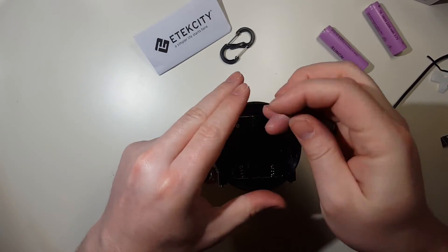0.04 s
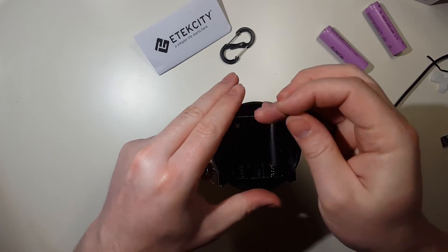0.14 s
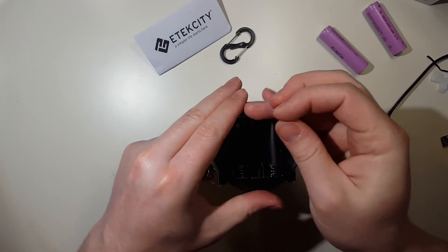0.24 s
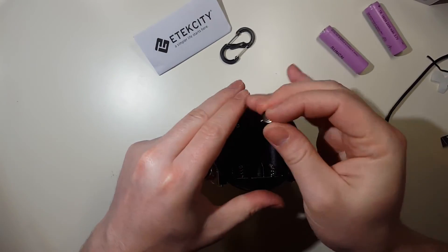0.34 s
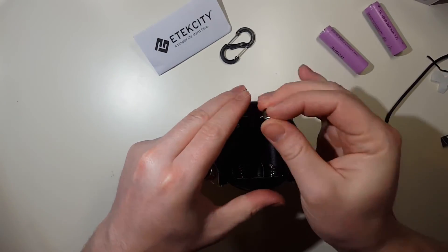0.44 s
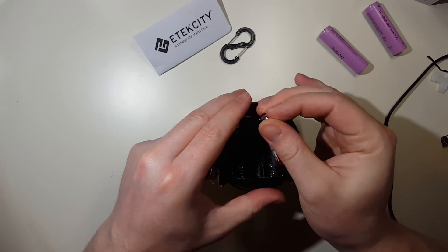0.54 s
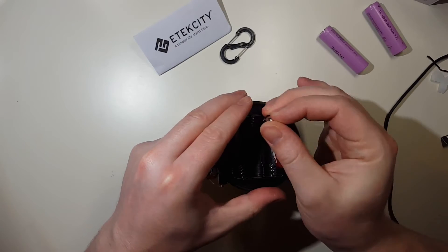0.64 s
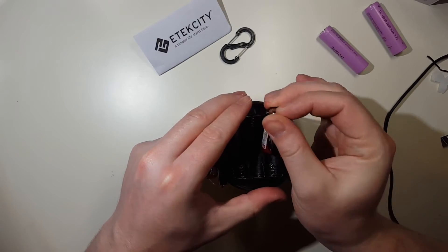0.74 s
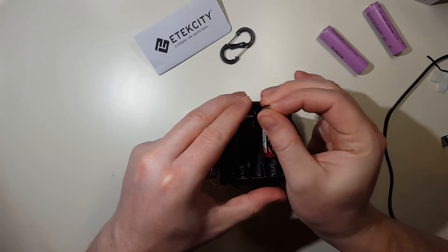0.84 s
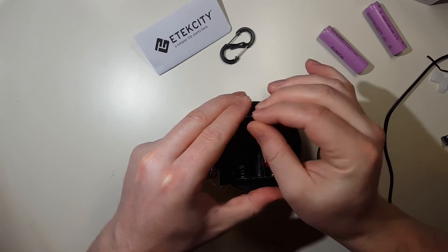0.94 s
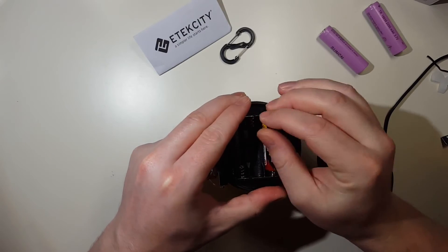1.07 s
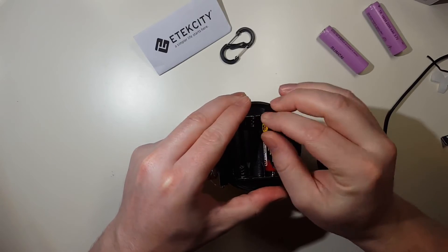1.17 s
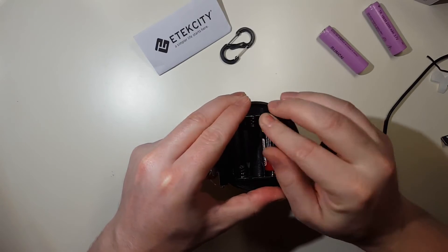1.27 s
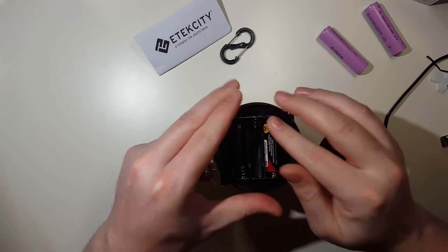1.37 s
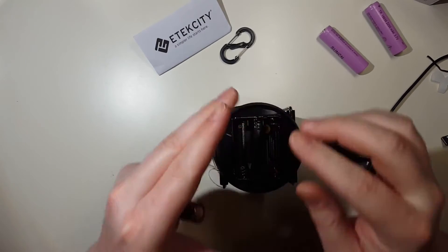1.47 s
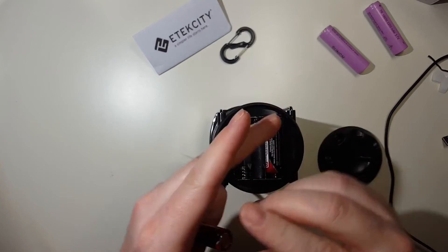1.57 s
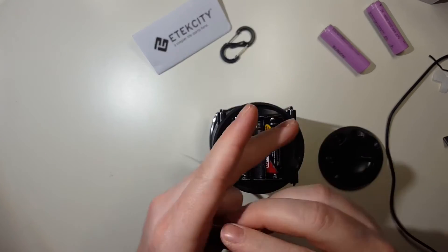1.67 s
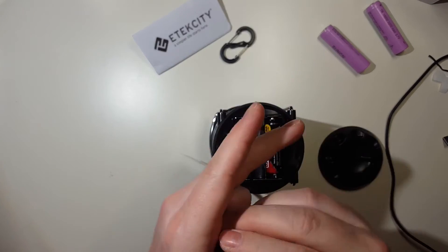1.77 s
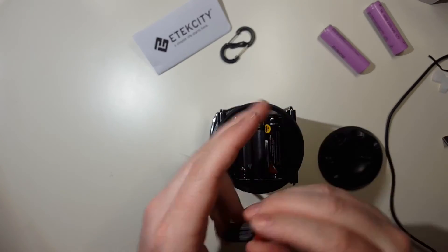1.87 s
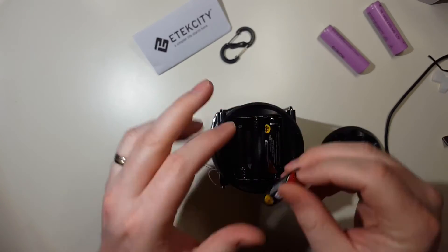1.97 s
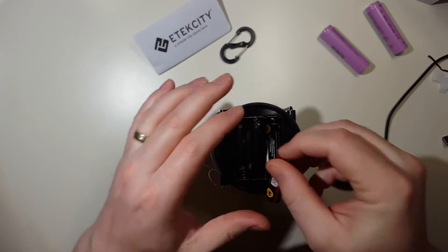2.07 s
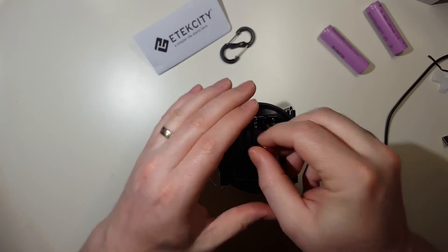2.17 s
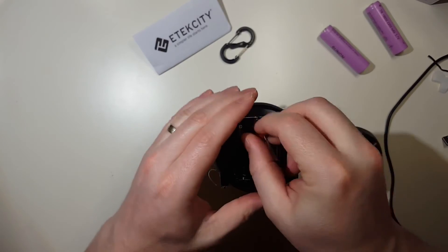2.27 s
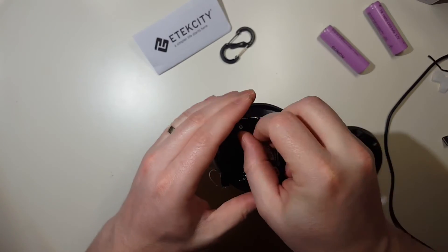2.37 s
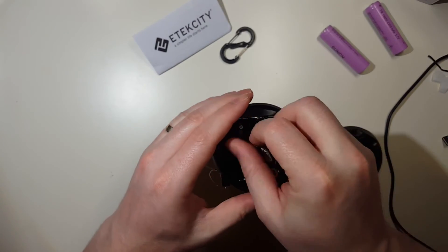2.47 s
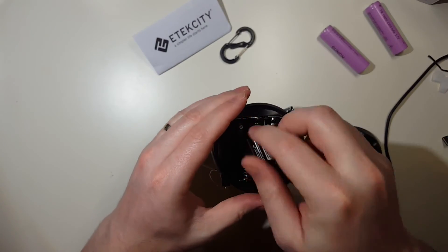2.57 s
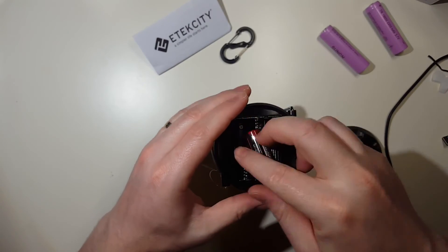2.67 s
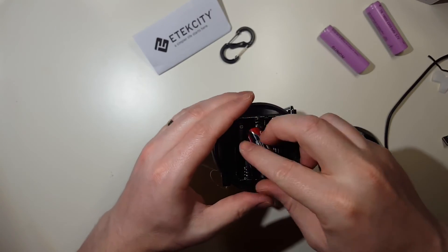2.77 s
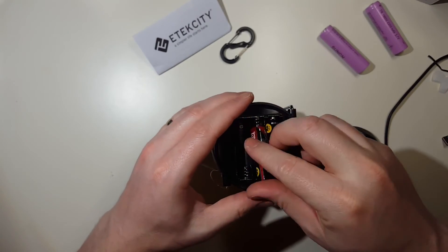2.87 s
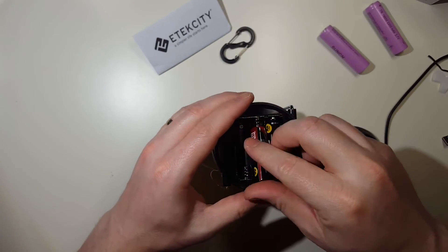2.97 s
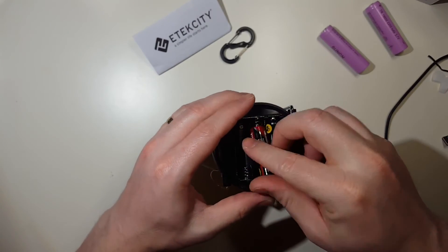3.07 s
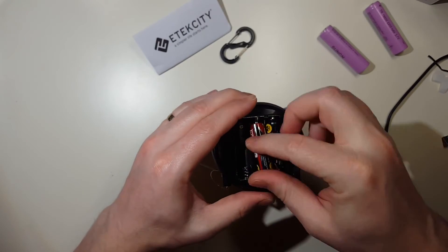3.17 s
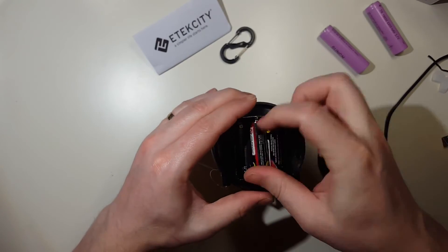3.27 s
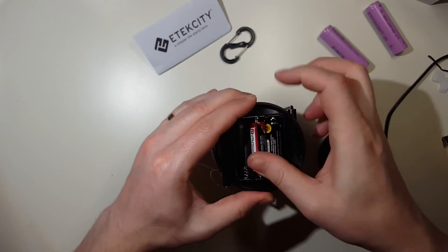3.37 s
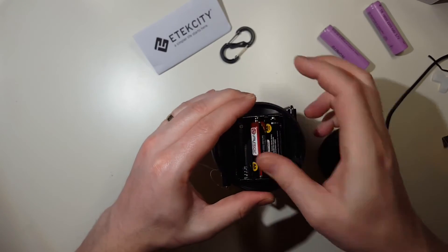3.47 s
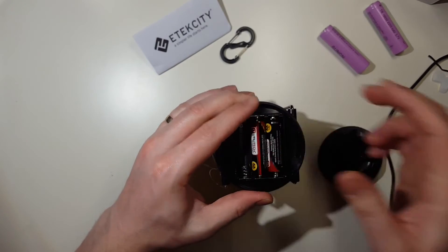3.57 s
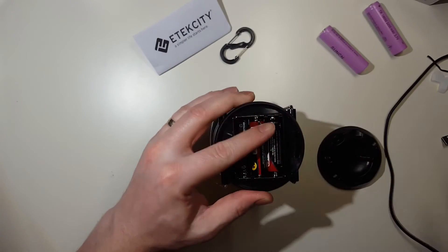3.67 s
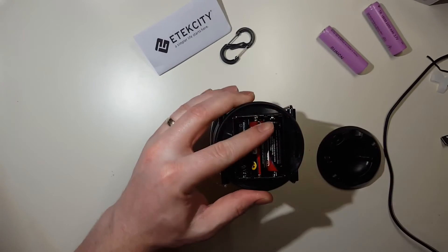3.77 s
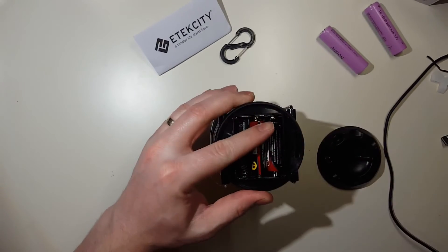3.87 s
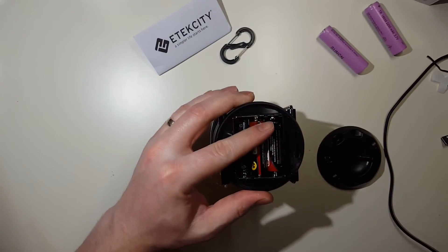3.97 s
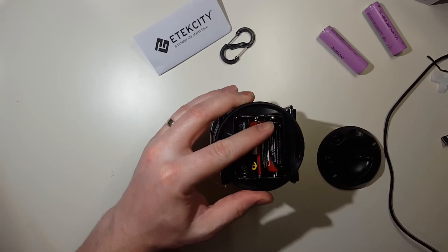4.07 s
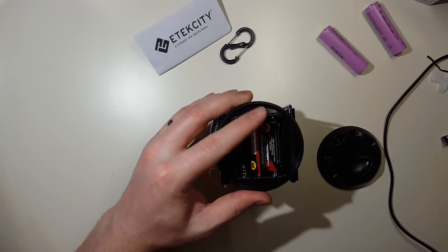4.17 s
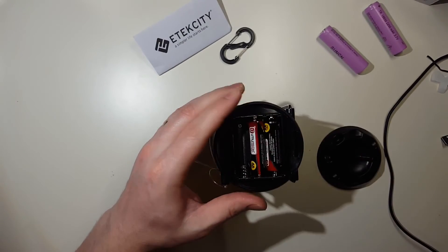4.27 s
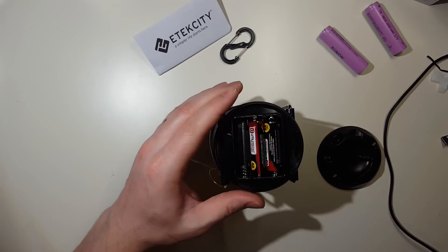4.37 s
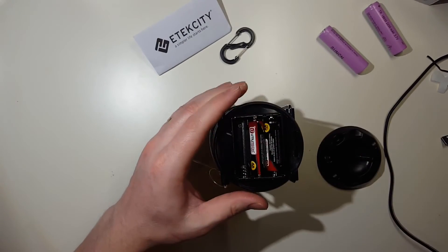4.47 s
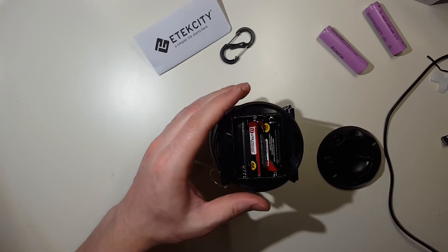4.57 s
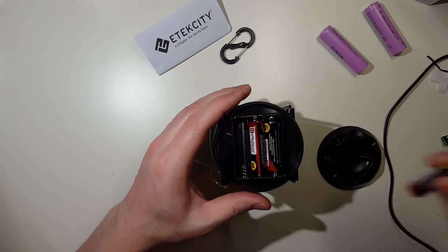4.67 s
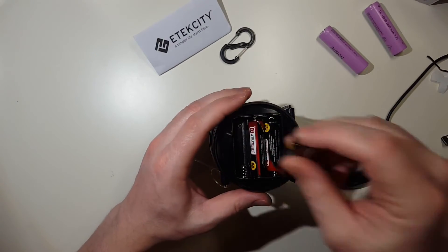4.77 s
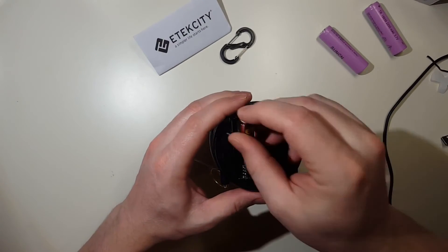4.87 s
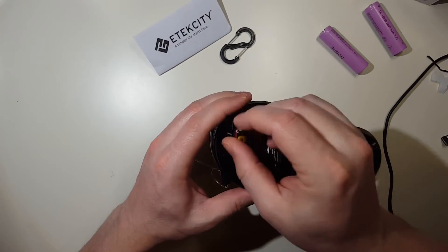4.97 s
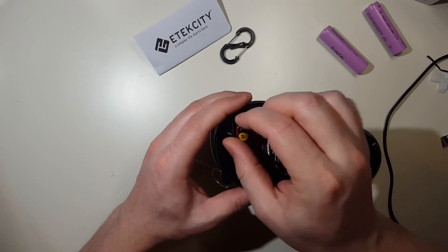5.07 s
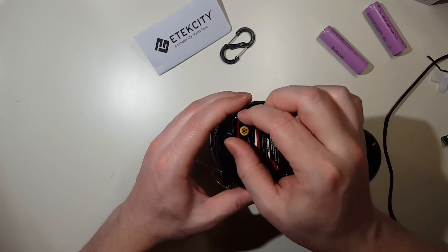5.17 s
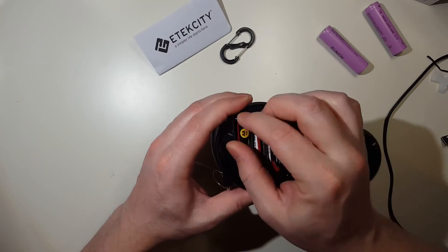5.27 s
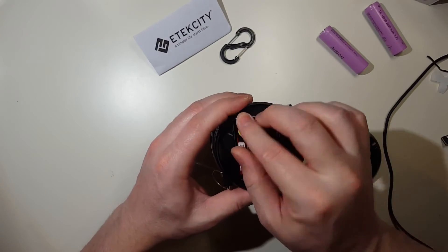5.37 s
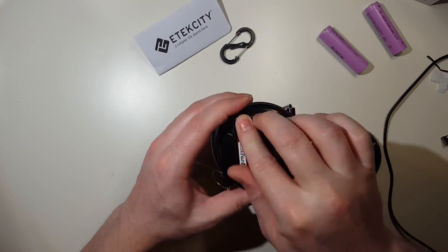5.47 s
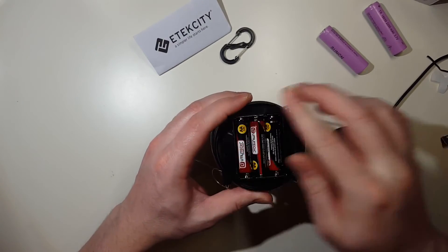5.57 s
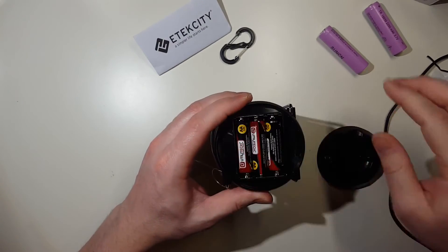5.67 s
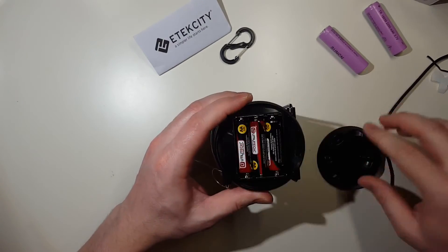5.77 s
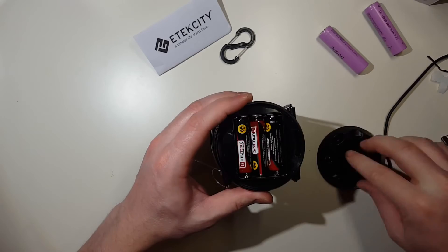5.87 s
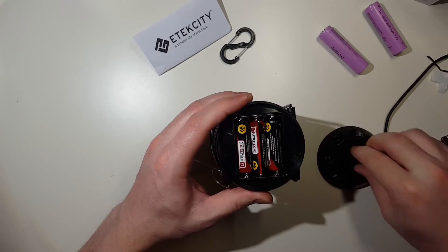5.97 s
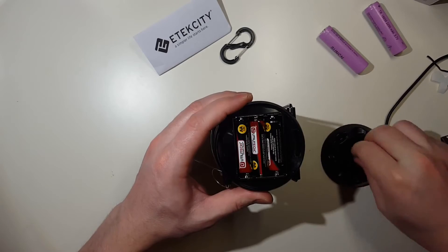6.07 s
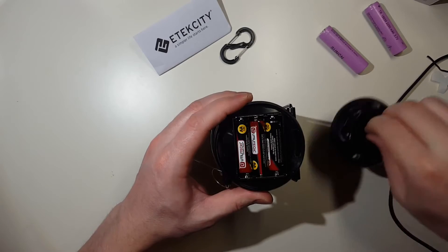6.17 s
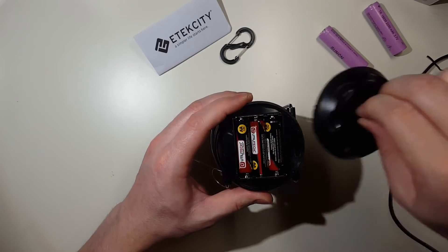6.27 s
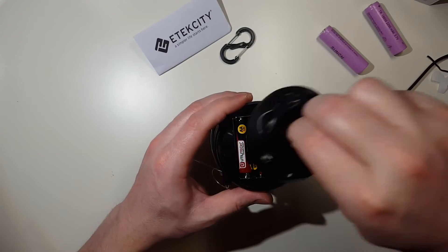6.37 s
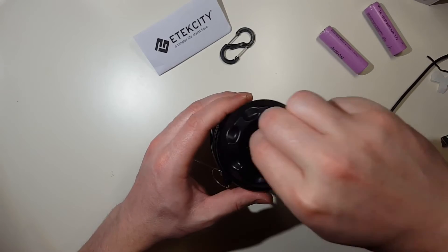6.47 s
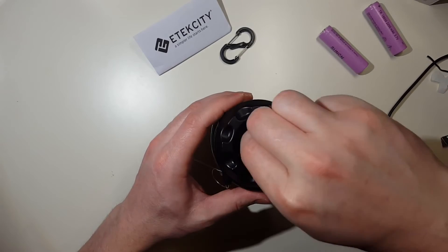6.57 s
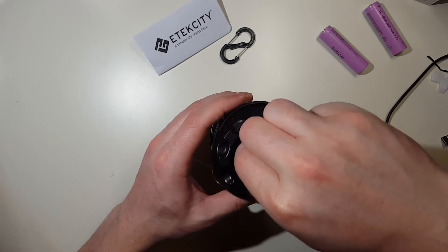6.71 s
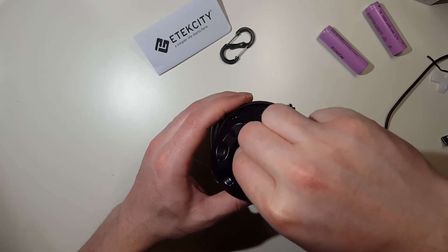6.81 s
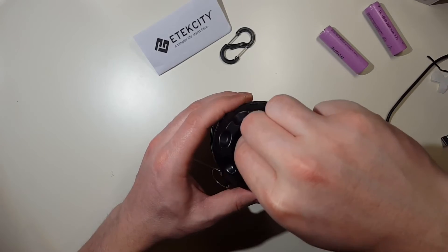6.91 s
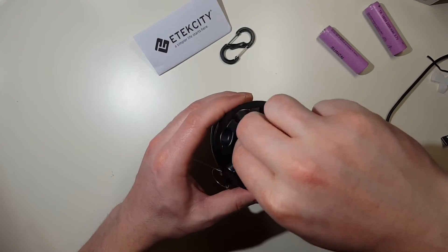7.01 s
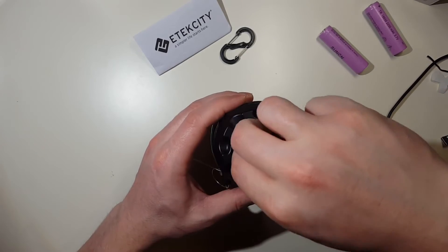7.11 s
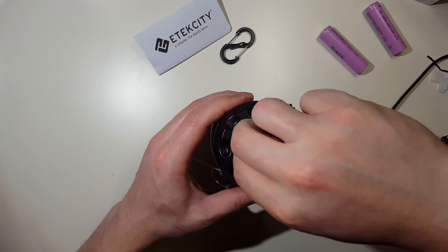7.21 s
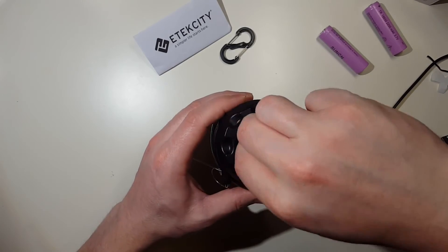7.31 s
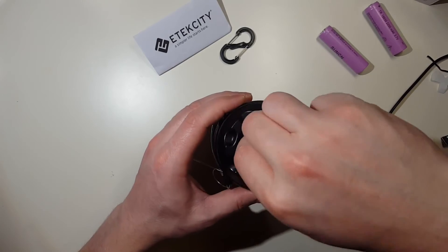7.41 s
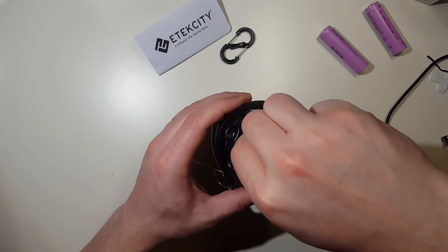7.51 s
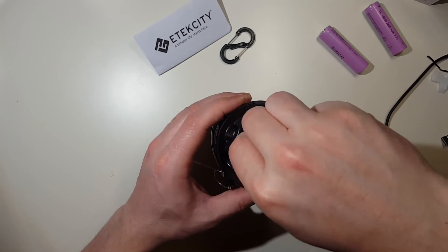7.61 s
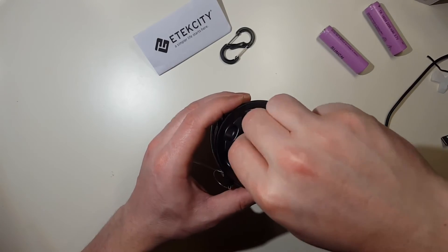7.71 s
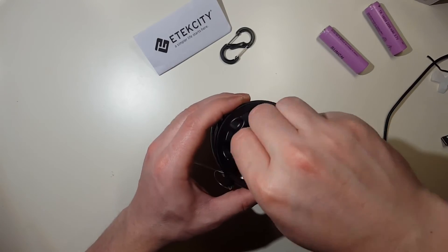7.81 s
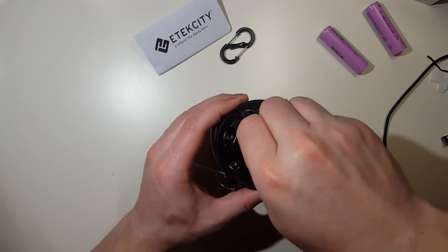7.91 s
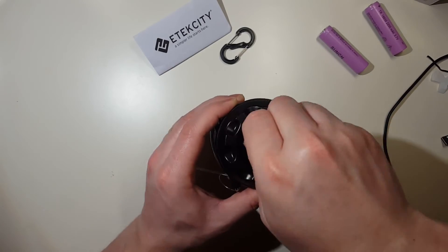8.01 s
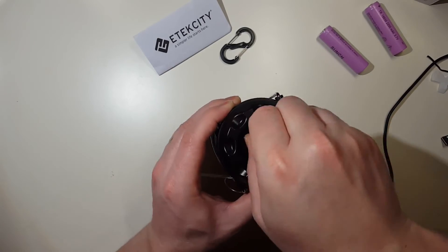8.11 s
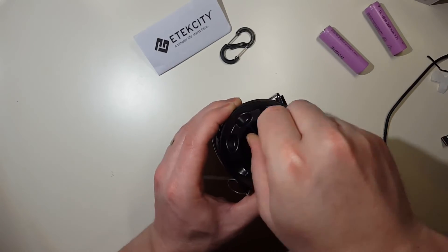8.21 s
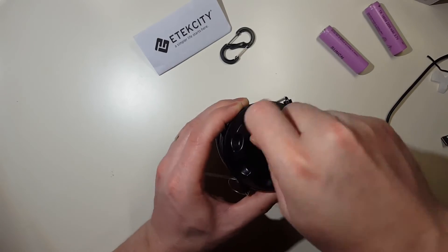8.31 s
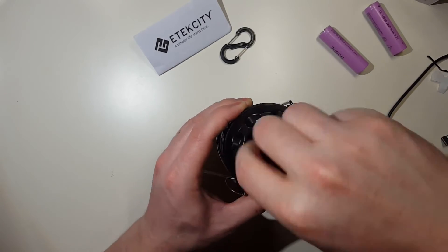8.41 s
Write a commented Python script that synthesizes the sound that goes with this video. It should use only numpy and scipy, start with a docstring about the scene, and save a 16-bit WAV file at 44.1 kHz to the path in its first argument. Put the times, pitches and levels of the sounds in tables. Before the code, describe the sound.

Fingers press small batteries into a hollow plastic lantern, making three clusters of sharp clicks with faint metallic pings, light rubbing and soft bumps on the table. Then a plastic cap is twisted on in short, grainy scrapes with a few more clicks. The sounds are close and in stereo, in a small quiet room with a low motor hum and faint hiss.

```python
"""Batteries into a lantern

Fingers press three small batteries into the plastic holder of a lantern on a table, then twist its cap on.
Knocks and stick-slip rubbing ring the hollow shell and thump the table top; contacts crack, skin hisses,
steel cells and springs ping. Behind it a motor hums in a quiet room and close stereo microphones hiss."""
import sys
import numpy as np
from scipy import signal
from scipy.fft import rfft, irfft, next_fast_len
from scipy.io import wavfile
from scipy.ndimage import uniform_filter1d

SR = 44100
rng = np.random.default_rng(int(sys.argv[2]) if len(sys.argv) > 2 else 0)


def transcribe(u):
    """Save the signal u as a 16-bit wav file named by the first command-line argument.

    u: samples, shape (n,) or (channels, n), limited to [-1, 1]; the rate is SR.
    q: integer samples, one column per channel.
    """
    v = np.clip(np.atleast_2d(u).T, -1, 1)
    q = np.round(v * 32767).astype(np.int16)
    wavfile.write(sys.argv[1], SR, q)


N = 372644
T = np.arange(N) / SR

# clicks of batteries, springs and cap: start_s, shell_db, thump_db, crack_db, snap_db, pitch_hz
CLICK_CUES = [(0.5393, -26, -26, -41, -72.5, 1660), (.8857, -30, -31.5, -46.5, -56.5, 1810),
              (0.906, -40.5, -55, -44.5, -55.5, 2120), (1.03, -40, -43, -48, -38.5, 1953),
              (1.058, -34.5, -37, -36, -28, 1710), (1.0878, -20, -25, -33, -43, 1580),
              (1.1635, -18.5, -29.5, -47, -34, 1490), (1.1827, -14.5, -24, -31.5, -17, 1954),
              (2.011, -50, -52.5, -46.5, -39, 2460), (2.167, -33, -21.5, -44, -63, 1930),
              (2.3353, -22, -30, -44, -56, 2150), (2.518, -37.5, -42, -64, -74, 2240),
              (2.809, -68, -54.5, -54.5, -49, 2480), (2.9105, -37, -58, -37.5, -34.5, 1340),
              (2.9526, -40.5, -35.5, -53.5, -62.5, 2220), (3.1055, -33.5, -50.5, -58, -73, 1440),
              (3.2209, -39, -40.5, -64, -66, 1950), (3.243, -43.5, -50, -63, -53, 2380),
              (3.2946, -36, -39.5, -42.5, -43.5, 910), (3.3054, -31.5, -53.5, -38.5, -41.5, 2180),
              (3.3983, -22, -34.5, -32, -42, 1990), (4.244, -62.5, -61.5, -66, -54.5, 930),
              (4.9924, -41.5, -38, -63.5, -49.5, 1272), (5.0738, -32, -29, -41, -53.5, 2580),
              (5.1974, -46, -42, -75, -60, 2700), (5.339, -64, -77, -61, -60, 2740),
              (5.3737, -61.5, -53.5, -65, -63, 2860), (5.4689, -23.5, -32.5, -32.5, -42, 2900),
              (5.4714, -17.5, -21.5, -25, -39.5, 1450), (5.613, -45.5, -58.5, -36.5, -48.5, 2500),
              (6.0731, -47.5, -42, -56.5, -52, 1170), (6.0928, -35, -52, -43.5, -37, 1292),
              (6.553, -29.5, -45.5, -60, -68, 1843), (6.6191, -45.5, -36, -66, -69, 1880),
              (6.6257, -22, -46, -47, -63, 1210), (6.774, -33.5, -59, -56.5, -57.5, 1560),
              (6.9334, -38.5, -56, -56.5, -67.5, 1460), (7.172, -37.5, -58, -54.5, -64.5, 1130),
              (7.257, -32.5, -75, -61, -58.5, 1200), (7.4513, -30.5, -33.5, -44.5, -58.5, 1250),
              (7.496, -28.5, -36.5, -55.5, -48, 1240), (7.5198, -15, -36.5, -34, -47, 1030),
              (7.5393, -22.5, -32, -36.5, -48, 1190), (7.858, -41, -40, -54, -58, 1090),
              (7.9559, -36.5, -72, -54, -69, 1120), (8.0344, -36.5, -44, -57.5, -65, 926),
              (8.4081, -35.5, -42, -54.5, -61.5, 1090)]
# soft bumps of the lantern on the table: start_s, shell_db, thump_db
BUMP_CUES = [(0.306, -45, -39), (0.6739, -48, -38), (0.8427, -60.5, -44.5), (1.4309, -51, -38),
             (2.3968, -52.5, -42.5), (2.868, -62.5, -45), (3.27, -47, -32), (3.5675, -47.5, -36.5),
             (3.816, -63.5, -45), (4.227, -59, -36), (4.3631, -62.5, -48), (4.618, -66, -51),
             (7.3238, -56.5, -43), (7.693, -51.5, -41.5), (8.1689, -50.5, -38)]
# strokes of fingers, batteries and cap thread: start_s, length_s, shell_db, rumble_db, skin_hiss_db
RUB_CUES = [(0.303, .059, -65, -48, -66), (0.886, 0.088, -36, -35.5, -66), (0.996, .08, -36, -30.5, -46),
            (1.315, 0.25, -64, -51, -68.5), (1.446, .039, -53.5, -43, -56), (2.2, 0.17, -60, -51.5, -75.5),
            (2.25, .07, -71, -52, -59.5), (2.573, 0.069, -64.5, -51.5, -57.5),
            (2.793, 0.027, -61.5, -58, -58), (3.067, 0.028, -58, -42, -71.5),
            (3.227, 0.067, -48.5, -41, -54.5), (3.307, .12, -51, -39.5, -55),
            (3.512, .078, -54.5, -49, -68), (3.634, 0.044, -60, -67, -62.5), (4.255, 0.19, -72, -60.5, -65),
            (4.978, 0.15, -76, -44.5, -76.5), (5.103, .065, -48, -43.5, -44),
            (5.192, 0.064, -54.5, -37.5, -59.5), (5.314, .092, -69.5, -54, -63.5),
            (5.628, 0.71, -61.5, -68, -77), (6.07, 0.059, -32.5, -25.5, -50),
            (6.145, 0.039, -44, -47.5, -58.5), (6.549, 0.039, -34, -41.5, -52.5),
            (6.699, 0.072, -34, -56, -60), (6.733, 0.1, -26, -43, -52), (6.834, 0.034, -47, -45, -73.5),
            (6.888, .11, -32, -45, -56.5), (6.956, 0.098, -37, -50, -57.5), (7.134, 0.079, -30, -46.5, -57),
            (7.238, .065, -43.5, -60, -60), (7.315, .1, -44, -37.5, -69.5), (7.376, 0.1, -34, -51, -57.5),
            (7.474, .043, -45, -36.5, -56.5), (7.833, .13, -45, -55, -60.5), (7.92, 0.2, -46.5, -48, -63),
            (8.013, 0.24, -43.5, -54, -60), (8.223, .07, -40.5, -45, -58.5), (8.276, 0.15, -52, -53, -65),
            (8.399, 0.19, -34.5, -27.5, -46)]
# ring of the hollow plastic shell: pitch_hz, level_db, t60_s
SHELL_MODES = [(1069, -6.5, 0.013), (1226.5, -4, 0.034), (1312, -9.5, 0.04), (1546, -8.5, 0.0082),
               (1578, -14.5, 0.05), (1797, 0, 0.015), (1846, -0.5, 0.017), (2060, -4.5, 0.01),
               (2175, -5.5, 0.0272), (2390, -11, 0.01), (2570, -2.5, 0.032), (2725, -5.5, 0.022),
               (2957, -8.5, 0.013), (3080, 0, 0.0058), (3493, -10.5, 0.0347), (3640, -5.5, 0.0084),
               (4275, -11, 0.027), (4350, -11.5, 0.0061), (1520, -7, 0.0038), (2410, -4.5, 0.0042),
               (3303, 1, 0.0016)]
# dull low body of the shell: pitch_hz, level_db, t60_s
BODY_MODES = [(508, -10.5, 0.021), (607, -9.5, 0.063), (653.6, -11, 0.019), (860, -11.5, 0.0085),
              (903.5, -15, 0.07)]
# thump of the table top: pitch_hz, level_db, t60_s
TABLE_MODES = [(78, -16.5, 0.14), (145, -3, .08), (172, -6.5, 0.035), (233.1, -2.5, 0.04),
               (316.6, -9, 0.075), (360.8, -20, 0.22)]
# ping of steel cells and springs: pitch_hz, level_db, t60_s
STEEL_MODES = [(2560, -13, .03), (4110, -14.5, 0.035), (4623, -12, .04), (5890, -15, 0.027),
               (6313, -13, .03), (8260, -23.5, 0.038)]
# tone curve of the contact crack: frequency_hz, gain_db
CRACK_EQ = [(2060, -26.5), (3500, -19), (3710, -8.5), (6520, -10), (9320, -10), (11200, -13.5),
            (11800, -15), (14300, -13), (16500, -36)]
# partials of the motor: pitch_hz, level_db
MOTOR_PARTIALS = [(40.4, -65.5), (80.8, -66), (121, -52.5), (161.5, -55), (202, -76), (242.2, -72),
                  (403.7, -82.5), (565, -81.5)]
# tone curve of room rumble and microphone hiss: frequency_hz, gain_db
AIR_EQ = [(28, -12.5), (50, -14.5), (65, -7.5), (100, 1.5), (140, -9.5), (172, 2), (190, -18.5),
          (492, -22.5), (750, -28), (2180, -34.5), (6530, -45), (11000, -44.5), (15800, -43),
          (16500, -54.5)]

FOCUS_OCT, MODE_SCATTER_DB, RUB_SCATTER_DB = 0.4, 3.5, 3.37
BUMP_HZ, BUMP_CRACK_DB, BUMP_SNAP_DB, BUMP_BODY_DB = 910, -18, -17, 6.5  # levels against shell_db
CAP_ON_S, BODY_OPEN_DB, BODY_CAPPED_DB = 6.5, -1, -7.5  # clicks lose body once the cap is on
BODY_THUMP_SHARE = 0.56  # the body follows partly the thump, partly the shell
CHATTER_S, CHATTER_STRETCH = 0.0082, 0.08  # decay when crack equals shell; brighter hits rattle longer
SETTLE_S = 0.12
LEFT_DB, RIGHT_LAG_S = .6, 4e-5
TREBLE_LEFT_DB, TREBLE_LAG_S, TREBLE_WIDTH = 1.3, 2.5e-4, .85
ROOM_T60_S, ROOM_DB, ROOM_DAMP_HZ = 0.18, -13.5, 4960
AIR_DB, AIR_CROSSOVER_HZ = -57, 653
BASS_CUT_HZ, TOP_CUT_HZ = 97, 16450


def lantern():
    """The close stereo sound: ringing shell and table, with the crack of contact on top."""
    mid, side = shell_and_table()
    bass_cut = signal.butter(2, BASS_CUT_HZ, "high", fs=SR, output="sos")
    ringing = signal.sosfilt(bass_cut, [mid + side, mid - side]) * pan_left(LEFT_DB)
    ringing[1] = np.interp(T - RIGHT_LAG_S, T, ringing[1])
    # short waves reach the two microphones by partly different paths
    left = contact_crack()
    shared = np.sqrt(1 - TREBLE_WIDTH ** 2) * np.roll(left, int(TREBLE_LAG_S * SR))
    right = shared + TREBLE_WIDTH * contact_crack()
    return ringing + np.array([left, right]) * pan_left(TREBLE_LEFT_DB)


def shell_and_table():
    """Knocks and rubs ring shell and table top, each mode leaning a little to one side: mid, side."""
    _, shell_db, thump_db, _, _, struck_hz, body_db = knocks()
    rub_start_s, rub_length_s, rub_shell_db, rumble_db, _ = np.transpose(RUB_CUES)
    click_s, *_, click_hz = np.transpose(CLICK_CUES)
    # a stroke takes its pitch from the clicks around it
    rub_hz = np.interp(rub_start_s + rub_length_s / 2, click_s, click_hz)
    friction = stick_slip(rate_hz=2800, spread_db=1.5)
    # every contact lands on another spot, so it favours other modes
    knock_scatter = MODE_SCATTER_DB * rng.standard_normal((len(shell_db), 40))
    rub_scatter = RUB_SCATTER_DB * rng.standard_normal((len(RUB_CUES), 40))
    layers = [(SHELL_MODES, shell_db, rub_shell_db, 16., -38),
              (TABLE_MODES, thump_db, rumble_db, 30., -19),
              (BODY_MODES, body_db, (rub_shell_db + rumble_db) / 2, 25., -26)]
    mid, side, k = np.zeros(N), np.zeros(N), 0
    for modes, knock_db, rub_db, push, rustle_db in layers:
        bursts = chatter(push)
        settling = rustle(knock_db + rustle_db)
        for hz, db, t60 in modes:
            struck_db = focus_db(hz, struck_hz) if modes is SHELL_MODES else 0
            rubbed_db = focus_db(hz, rub_hz) if modes is SHELL_MODES else 0
            hits = place_knocks(knock_db + struck_db + knock_scatter[:, k], bursts)
            rubs = friction * stroke_pressure(rub_db + rubbed_db + rub_scatter[:, k])
            polarity = (-1) ** k  # neighbouring modes move in opposite senses
            tone = polarity * undb(db) * ring(hits + settling + rubs, hz, t60)
            mid += tone
            side += tone * (-1) ** (k // 2) * min(hz / 3000, .2)
            k += 1
    return mid, side


def contact_crack(split_hz=10500):
    """The crack of contact and the hiss of skin; metal on metal snaps brighter and pings."""
    _, _, _, crack_db, snap_db, *_ = knocks()
    *_, skin_db = np.transpose(RUB_CUES)
    bursts = chatter(push=3.)
    skin = stick_slip(rate_hz=5400, spread_db=0.96) * stroke_pressure(skin_db, sharpness=6.1)
    low, high = (signal.butter(3, split_hz, kind, fs=SR, output="sos") for kind in ("low", "high"))
    crack = signal.sosfilt(low, place_knocks(crack_db, bursts))
    snap = signal.sosfilt(high, place_knocks(snap_db, bursts))
    force = crack + snap + skin + rustle(np.maximum(crack_db, snap_db) - 36)
    ping = sum(undb(db) * ring(crack + skin, hz, t60) for hz, db, t60 in STEEL_MODES)
    return equalise(force, CRACK_EQ) * np.sqrt(np.mean(force ** 2)) + ping


def knocks():
    """All clicks and bumps: start_s, shell_db, thump_db, crack_db, snap_db, pitch_hz, body_db."""
    start_s, shell_db, thump_db, *_ = np.transpose(CLICK_CUES)
    cap_db = np.where(start_s < CAP_ON_S, BODY_OPEN_DB, BODY_CAPPED_DB)
    body_db = shell_db + BODY_THUMP_SHARE * (thump_db - shell_db) + cap_db
    clicks = np.column_stack([CLICK_CUES, body_db])
    _, bump_db, _ = np.transpose(BUMP_CUES)
    bumps = np.column_stack([BUMP_CUES, bump_db + BUMP_CRACK_DB, bump_db + BUMP_SNAP_DB,
                             np.full(len(bump_db), BUMP_HZ), bump_db + BUMP_BODY_DB])
    return np.vstack([clicks, bumps]).T


def chatter(push):
    """The force of each knock: a sharp push, then a dying burst of noise."""
    t = np.arange(4096) / SR
    _, shell_db, _, crack_db, *_ = knocks()
    decay_s = np.clip(CHATTER_S * undb(CHATTER_STRETCH * (crack_db - shell_db)), .0015, .015)
    noise = unit_rms(rng.standard_normal((len(shell_db), len(t))))
    noise[:, 0] = push
    return noise * np.exp(-t / decay_s[:, None])


def place_knocks(gains_db, shapes):
    """Lay one shape on the timeline at each knock."""
    track = np.zeros(N + shapes.shape[1])
    for at, db, shape in zip((knocks()[0] * SR).astype(int), gains_db, shapes):
        track[at:at + len(shape)] += undb(db) * shape
    return track[:N]


def focus_db(hz, contact_hz):
    """Modes far from the pitch of the contact are excited less."""
    return np.maximum(-6 * (np.log2(hz / contact_hz) / FOCUS_OCT) ** 2, -16)


def ring(force, hz, t60):
    """One decaying mode; unit white force gives rms 1."""
    radius = np.exp(-np.log(1000) / (t60 * SR))
    pole = radius * np.exp(2j * np.pi * hz / SR)
    return signal.lfilter([np.sqrt(2 * (1 - radius * radius))], [1, -pole], force).imag


def stick_slip(rate_hz, spread_db):
    """The grain of friction: random catches of very uneven size."""
    catches = rng.random(N) < rate_hz / SR * undb(3.1 * drift(40))
    grains = catches * rng.standard_normal(N)
    accent_db = spread_db * np.minimum(rng.exponential(size=N), 3)
    return unit_rms(grains * undb(accent_db))


def stroke_pressure(gains_db, sharpness=2.8):
    """The envelope of the rubbing: each stroke swells and fades."""
    power = np.zeros(N + SR)
    for (start_s, length_s, *_), db in zip(RUB_CUES, gains_db):
        at, size = int(start_s * SR), int(length_s * SR)
        power[at:at + size] += undb(2 * db) * np.sin(np.pi * np.arange(size) / size) ** sharpness
    return np.sqrt(power[:N])


def rustle(gains_db):
    """Loose parts settle after every knock: a faint noise that dies slowly."""
    fade = np.exp(-np.arange(SR // 2) / SR / SETTLE_S)
    power = place_knocks(2 * gains_db, np.tile(fade ** 2, (len(gains_db), 1)))
    return rng.standard_normal(N) * np.sqrt(power)


def room_reverb(close):
    """A small furnished room: a separate short, dull tail on each side."""
    t = np.arange(SR // 2) / SR
    fade_in = np.clip(t / 0.005 - 1, 0, 1)
    tail = rng.standard_normal((2, len(t))) * undb(-60 * t / ROOM_T60_S) * fade_in
    tail = signal.lfilter(*signal.butter(1, ROOM_DAMP_HZ, fs=SR), tail)
    tail = signal.lfilter(*signal.butter(1, 500, "high", fs=SR), tail)
    tail /= np.sqrt(np.sum(tail ** 2, axis=1, keepdims=True))
    return undb(ROOM_DB) * signal.fftconvolve(close[:1], tail, axes=1)[:, :N]


def motor_hum(waver_db=1.8):
    """A motor's partials ride one slightly unsteady shaft speed, each wavering in level."""
    shaft_time = np.cumsum(1 + .002 * drift(3)) / SR
    hum = np.zeros(N)
    for hz, db in MOTOR_PARTIALS:
        level = np.sqrt(2) * undb(db + waver_db * drift(8.5))
        hum += level * np.sin(2 * np.pi * (hz * shaft_time + rng.random()))
    return hum * pan_left(.6)


def room_tone():
    """Centred room rumble, crossing over into each microphone's own hiss."""
    beds = equalise(rng.standard_normal((3, N)), AIR_EQ)
    centre, sides = beds[0], beds[1:]
    low, high = (signal.butter(1, AIR_CROSSOVER_HZ, kind, fs=SR) for kind in ("low", "high"))
    rumble = signal.lfilter(*low, centre)
    hiss = np.sqrt(2) * signal.lfilter(*high, sides) + 0.22 * sides
    return undb(AIR_DB + 0.2 * drift(3.5)) * (rumble + hiss)


def equalise(x, curve):
    """Shape the tone by a curve of frequency_hz, gain_db points; rms 1."""
    hz, db = np.transpose(curve)
    size = next_fast_len(N)
    bins_hz = np.maximum(np.arange(size // 2 + 1) * SR / size, 1)
    gain = undb(np.interp(np.log(bins_hz), np.log(hz), db))
    return unit_rms(irfft(rfft(x, size) * gain, size)[..., :N])


def drift(rate_hz):
    """Smooth random modulation with a spread near 1."""
    hold = int(SR / rate_hz)
    steps = np.repeat(rng.standard_normal(N // hold + 1), hold)
    return 1.3 * uniform_filter1d(uniform_filter1d(steps, hold), hold)[:N]


def pan_left(db):
    return undb([[db], [-db]])


def undb(db):
    return 10 ** (np.asarray(db) / 20)


def unit_rms(x):
    return x / np.sqrt(np.mean(x ** 2, axis=-1, keepdims=True))


def scene():
    """The lantern up close, over its reverb, the motor and the room tone."""
    close = lantern()
    return close + room_reverb(close) + motor_hum() + room_tone()


def record(dry):
    """A steep low-pass takes off the very top."""
    return signal.sosfilt(signal.ellip(10, .2, 80, TOP_CUT_HZ, fs=SR, output="sos"), dry)


dry = scene()
out = record(dry)
transcribe(out)
```